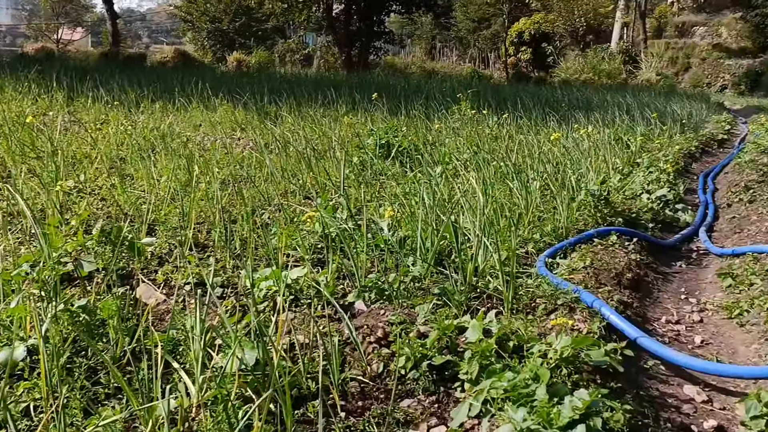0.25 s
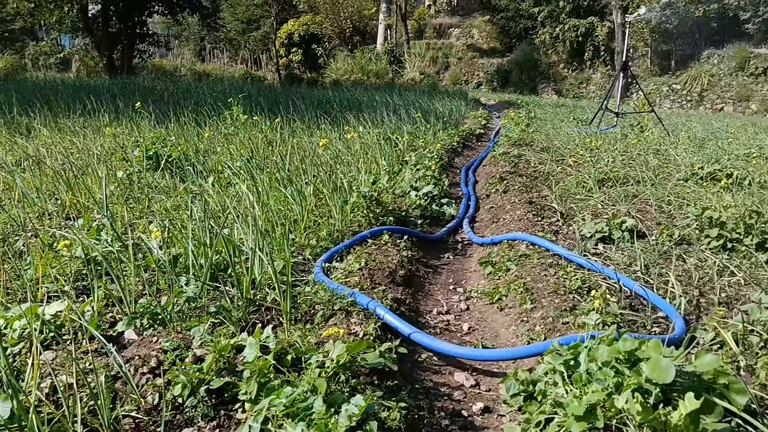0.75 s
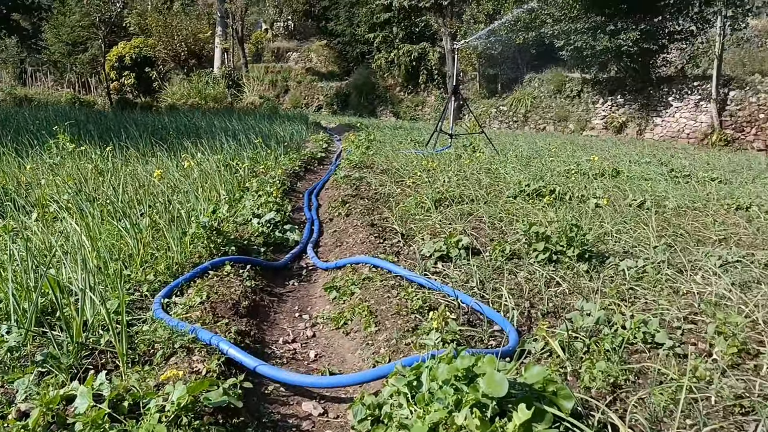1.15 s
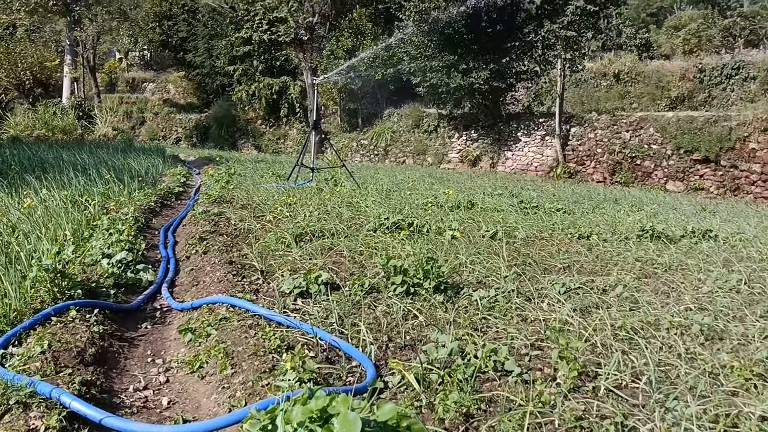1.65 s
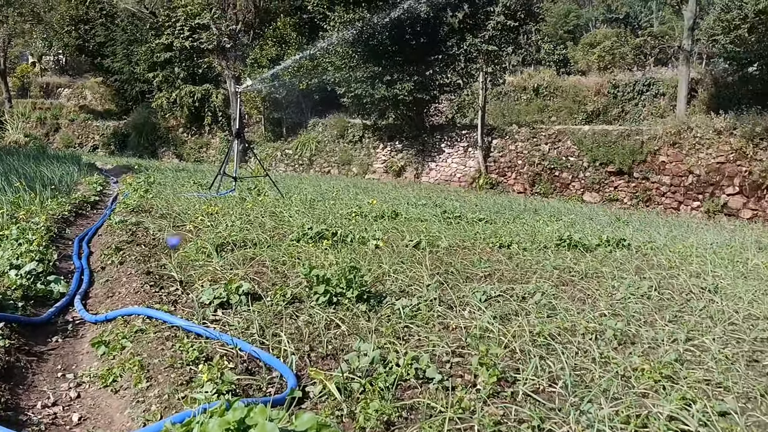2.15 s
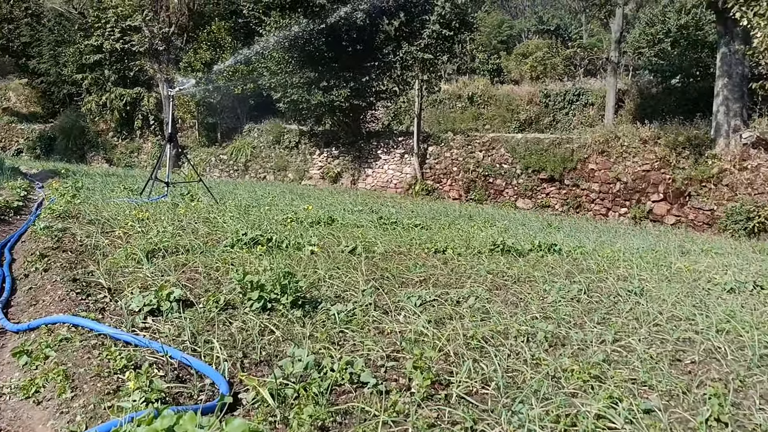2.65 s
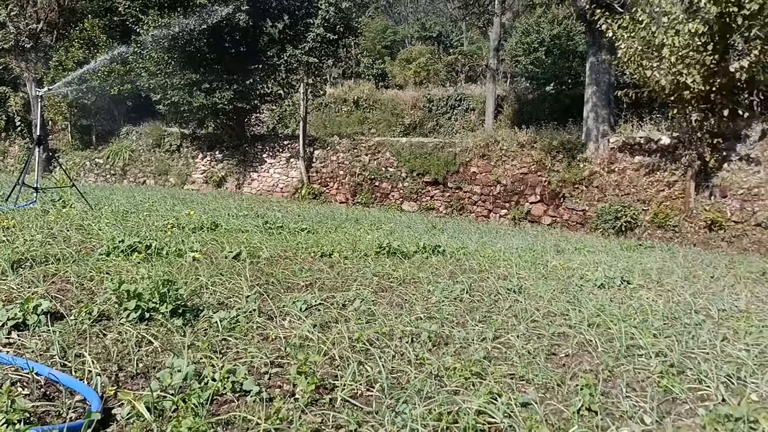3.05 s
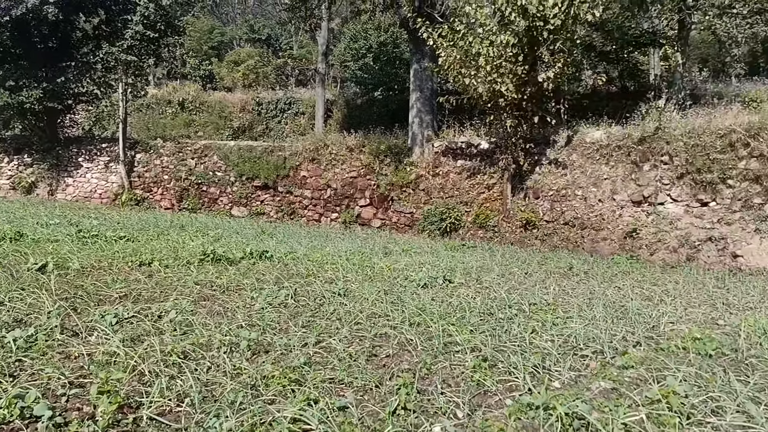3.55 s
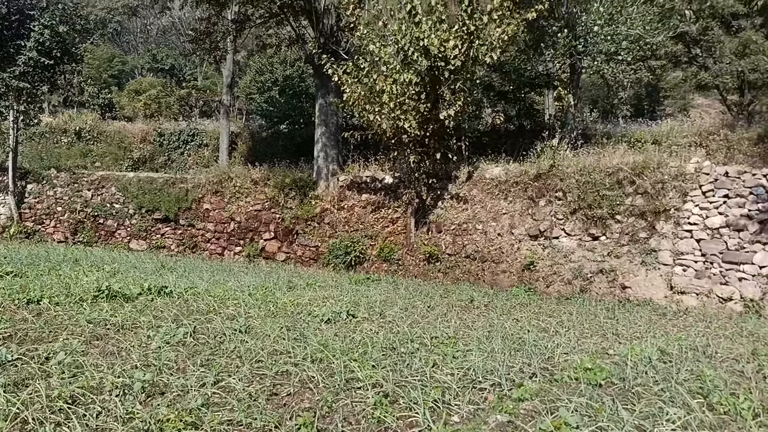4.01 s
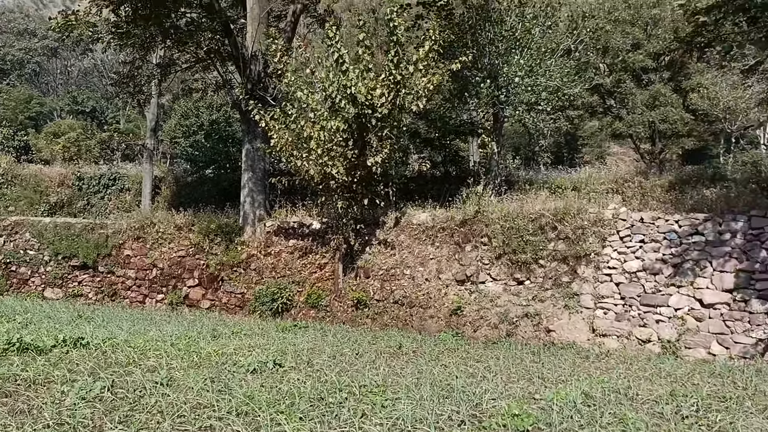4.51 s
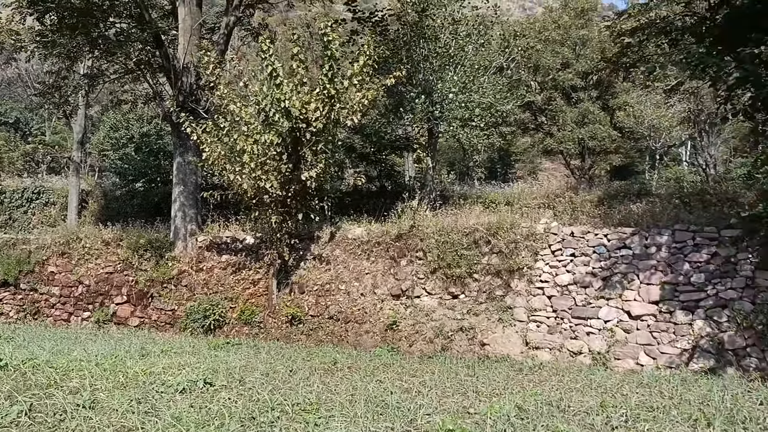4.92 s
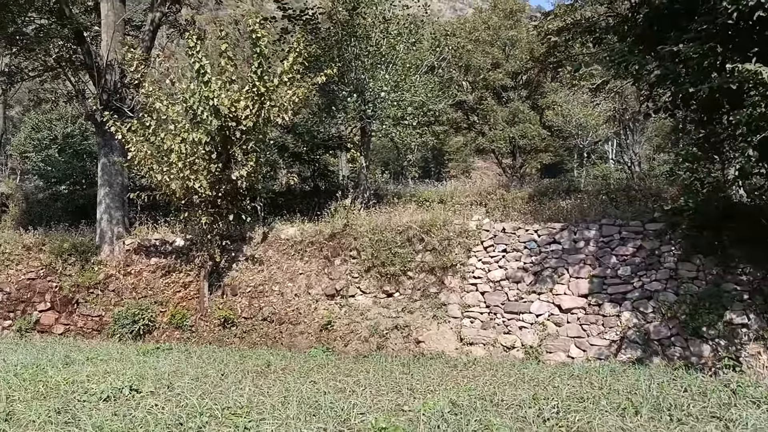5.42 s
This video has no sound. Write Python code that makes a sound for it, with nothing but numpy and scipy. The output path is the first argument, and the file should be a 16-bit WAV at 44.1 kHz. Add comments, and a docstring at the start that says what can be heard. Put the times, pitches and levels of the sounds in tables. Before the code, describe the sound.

Regular splashy bursts of a sprinkler arm cutting its water jet, with soft spray hiss and light outdoor rumble. Small snaps and irregular splashes appear midway, plus one faint thin note. After four seconds a hard clack starts a fast, even rattle of slaps and knocks, lasting to the end with soft thuds near the microphone. Weak, short echo from stone walls and trees; the source pans right to left.

```python
"""Impact sprinkler on a terraced field

A sprung arm slaps the jet six times a second; then the reversing catch trips and it hammers back twice as fast.
Slaps are shaped bursts of random drops; knocks and dry ticks are damped modes; jet and mist are coloured noise.
The sprinkler's bearing pans from right to left by arrival time, and stone walls and trees echo it.
A low rumble, far hums, one thin note and a few soft thuds complete the field."""
import sys
import numpy as np
from scipy import signal
from scipy.fft import rfft, irfft
from scipy.io import wavfile
from scipy.ndimage import map_coordinates

SR = 44100
rng = np.random.default_rng(int(sys.argv[2]) if len(sys.argv) > 2 else 0)


def file_out(sig):
    """Save sig as 16-bit WAV at sys.argv[1]."""
    # one column per channel
    cols = np.atleast_2d(sig).T
    # limit, then scale
    lim = np.clip(cols, -1, 1)
    pcm = np.round(lim * 32767).astype(np.int16)
    wavfile.write(sys.argv[1], SR, pcm)


N = 267687
TIME = np.arange(N) / SR
FREQS = np.fft.rfftfreq(N, 1 / SR)


def undb(db):
    """Logarithmic level: decibels to amplitude gain."""
    return 10 ** (np.asarray(db) / 20)


def unit(x):
    """Normalization by energy: scale to rms 1."""
    return x / np.sqrt(np.mean(x ** 2))


def curve(rows, axis=1):
    """Linear interpolation: one column of a table over time."""
    rows = np.array(rows)
    return np.interp(TIME, rows[:, 0], rows[:, axis])


def response(points):
    """Frequency response: gain at every frequency from (Hz, dB) points on a log axis."""
    hz, db = np.transpose(points)
    return undb(np.interp(np.log(FREQS + 1), np.log(hz), db))


def colour(x, points):
    """Spectral shaping: filter by a spectrum, keeping the power of white noise."""
    return irfft(rfft(x) * unit(response(points)), N)


def wander(rate):
    """Random modulation: normal values at a rate per second, joined by straight lines."""
    knots = rng.standard_normal(2048)
    return 1.55 * np.interp(TIME * rate, np.arange(len(knots)), knots)


def drops(rate, spread_db, mist, channels=3):
    """Shot noise: droplet impacts of very unequal size, over a smooth mist."""
    hit = rng.random((channels, N)) < rate / SR
    size = undb(spread_db * np.minimum(rng.standard_exponential((channels, N)), 4.5))
    impacts = unit(hit * size * rng.standard_normal((channels, N)))
    return unit(impacts + mist * rng.standard_normal((channels, N)))


def arrive(x, lead_ms):
    """Interaural-style time difference: one sound at two ports, the left earlier by the lead."""
    shift = lead_ms * SR / 2000  # half the lead at each port, in samples
    return np.array([map_coordinates(x, [np.arange(N) + side * shift], order=3) for side in (1, -1)])


# bearing of the sprinkler: start_s, lead of the left port [ms]
BEARING = [(0, -0.4), (.75, -0.23), (1.25, 0.33), (1.8, 0.36), (4.2, 0.474), (6, 0.52)]


def spread(three, direct):
    """Partial coherence: one signal comes from the bearing, two more from all over the field."""
    direct = np.clip(direct, 0, 1)
    return np.sqrt(direct) * arrive(three[0], curve(BEARING)) + np.sqrt(1 - direct) * three[1:]


def ring(modes, detune, contact_s):
    """Modal synthesis: a short blow sets damped modes ringing, in a fresh mix, at peak 1."""
    t = np.arange(2048) / SR
    hz, width, db = np.array(modes).T[:, :, None]
    phase = 2 * np.pi * rng.random(hz.shape)
    size = undb(db + rng.standard_normal(hz.shape))
    decay = np.exp(-np.pi * width * t)
    y = (size * decay * np.sin(2 * np.pi * hz * detune * t + phase)).sum(axis=0)
    y *= 1 - np.exp(-(t / contact_s) ** 2)  # soft onset while the bodies touch
    return y / abs(y).max()


def scatter(x, share, span_s):
    """Multipath interference: paths a few ms apart give each hit its own uneven resonances."""
    lag = (SR * span_s * (.1 + rng.random(6))).astype(int)
    gain = share * rng.standard_normal(6) / np.sqrt(6)
    paths = sum(g * np.roll(x, k) for g, k in zip(gain, lag))
    return (x + paths) / np.sqrt(1 + (gain ** 2).sum())


def place(x, start):
    """Superposition in time: lay a short sound into the scene at a start time."""
    return np.pad(x, (max(int(start * SR), 0), N))[:N]


# spray: start_s, hiss_level_db, mean mist_level_db
SPRAY = [(0, -46.5, -56), (0.9, -49, -56), (1.45, -46.5, -52), (2.2, -48, -55), (2.7, -46, -53.5),
         (4.25, -47.5, -52.5), (4.5, -44.5, -45.5), (4.9, -44.5, -52), (6.07, -45, -50.5)]
# coarser spray, relative spectrum: frequency_hz, density_db [dB per Hz]
HISS_COLOUR = [(400, -13.5), (580, -16), (850, -1), (1000, -2.5), (1130, -7.5), (1600, -2), (3000, -2),
               (5200, -1), (6400, 3.5), (7500, -10.5), (12000, -22.5), (16000, -17)]
# fine mist at the nozzle, relative spectrum: frequency_hz, density_db [dB per Hz]
MIST_COLOUR = [(3000, -36), (7000, -24), (9500, -6), (12300, 3), (13500, -2), (16000, -0.5)]
SPRAY_BALANCE_DB = 2  # left minus right


def spray():
    """Turbulent jet noise hisses, drops patter on leaves, a few big ones stand out, mist sizzles."""
    patter = drops(rate=2500, spread_db=2.0, mist=1.43) * undb(0.56 * wander(25.015) + 1.0 * wander(140))
    splat = rng.standard_normal((3, 256)) * np.exp(-np.arange(256) / SR / 0.0018)
    big = signal.fftconvolve(drops(rate=25, spread_db=3.0, mist=0), splat, axes=1)[:, :N]
    hiss = spread(colour(patter, HISS_COLOUR) + undb(-18.5) * unit(big), direct=0.087)
    mist = spread(colour(drops(rate=3100, spread_db=7.5, mist=2.3), MIST_COLOUR), direct=0.087)
    balance = undb(np.array([[.5], [-.5]]) * SPRAY_BALANCE_DB)
    hiss_db = curve(SPRAY)
    mist_db = curve(SPRAY, axis=2) + 1.3 * wander(30)
    return balance * (hiss * undb(hiss_db) + mist * undb(mist_db))


def tone(hz, waver_hz, db):
    """Frequency modulation: a wavering sine of a given rms level."""
    pitch_hz = hz + waver_hz * wander(10)
    return np.sqrt(2) * undb(db) * np.sin(2 * np.pi * np.cumsum(pitch_hz) / SR)


# outdoor rumble, relative spectrum: frequency_hz, density_db [dB per Hz]
AIR_COLOUR = [(13, -37), (22, -4), (58, -1.5), (92, -0.5), (129, 2), (329, -1.5), (497, -11.5),
              (572, -13.5), (650, -6.5), (840, -2), (1430, -120)]
# far-off hums that swell once: peak_s, swell half length_s, pitch_hz, peak level_db, swell_db
HUMS = [(2.37, 0.8, 65.3, -66.5, 9), (2.1, 0.74, 127.5, -70.5, 9), (5.5, 0.77, 178.3, -66.5, 17)]


def valley():
    """Ambient noise floor: low outdoor rumble, light air at each port, wavering far-off hums."""
    air = colour(rng.standard_normal((3, N)), AIR_COLOUR) * undb(1.23 * wander(9))
    breeze_colour = [(15, -11), (35, 4), (90, -4), (200, -9), (800, -52)]
    breeze = colour(rng.standard_normal((2, N)), breeze_colour) * undb(1.8 * wander(7))
    hum = 0
    for peak, half, hz, db, swell_db in HUMS:
        below_peak_db = swell_db * (1 - np.exp(-((TIME - peak) / half) ** 2))
        hum = hum + tone(hz, waver_hz=0.0157 * hz, db=db - below_peak_db)
    # the first air signal is common to both ports
    return undb(-62.5) * (air[0] + 0.44 * air[1:]) + undb(-73.5) * breeze + hum


def bursts(rows, rise_s, decay_s, sheet, graze, tail_db, tail_s):
    """Jet interruption: the spoon grazes the jet, water bursts, sheets off while in it, then scatters."""
    out, before = np.zeros(N), .04  # the approach starts this many seconds early
    t = np.arange(SR // 4) / SR - before
    entry = .5 + .5 * np.tanh((t - rise_s) / rise_s)
    approach = graze * np.exp(np.minimum(t, 0) / 0.013) * (1 - entry)
    age = np.maximum(t - 2 * rise_s, 0)
    tail = undb(tail_db) * np.exp(-age / tail_s)
    water = drops(rate=7000, spread_db=2.2, mist=.6) * undb(1.5 * wander(420))
    low = signal.sosfilt(signal.butter(2, 4000, fs=SR, output="sos"), water)
    high = signal.sosfilt(signal.butter(2, 4000, "high", fs=SR, output="sos"), water)
    for k, (start, db, treble_db, dwell) in enumerate(rows):
        in_jet = .5 - .5 * np.tanh((t - dwell) / 0.0024)
        shape = approach + entry * ((np.exp(-age / decay_s) + sheet) * in_jet + tail)
        part = k * (SR // 8) + np.arange(len(t))  # another stretch of water for each stroke
        burst = shape * (undb(db) * low[:, part] - undb(treble_db) * high[:, part])
        # a stroke throws the same amount of water however it breaks into drops
        burst *= np.std(shape) / np.std(shape * water[:, part], axis=1, keepdims=True)
        out = out + np.array([place(scatter(b, share=.7, span_s=.003), start - before) for b in burst])
    return out


# the fast return: first knock, first period, and how much each stroke shortens
RETURN_START_S, RETURN_PERIOD_S, RETURN_QUICKEN_S = 4.5071, 0.08144, 0.00009


def return_beats(count):
    """Quickening periodic motion: times at which the arm strikes its stop on the return."""
    periods = RETURN_PERIOD_S - RETURN_QUICKEN_S * np.arange(count)
    return RETURN_START_S + np.cumsum(periods) - periods


# treble in the slaps, before mixing: start_s, level_db
SLAP_TREBLE = [(0, -31.5), (0.8, -32.5), (1.5, -29.5), (3.1, -30), (3.7, -36), (4.45, -29.5), (4.75, -32.5),
               (5.05, -27.5), (6.07, -28)]


def strokes(rows, dwell_s):
    """Time-varying timbre: give each slap the treble of its moment and its time in the jet."""
    return [(start, db, np.interp(start, *np.transpose(SLAP_TREBLE)), dwell_s) for start, db in rows]


# the spoon cuts the jet on the slow sweep, before mixing: start_s, level_db
SLAPS = [(0.0933, -24), (0.2521, -23.5), (0.411, -25), (0.58, -22), (0.728, -26.5), (0.9012, -25.5),
         (1.0514, -23.5), (1.2093, -24.5), (1.3655, -25), (1.5226, -26), (1.6815, -26.5), (1.8379, -23),
         (1.9957, -23.5), (2.1518, -22), (2.3069, -26), (2.4794, -25.5), (2.6305, -26), (2.7896, -27.5),
         (2.9487, -28), (3.1023, -26.5), (3.258, -26.5), (3.4156, -29.5), (3.5864, -29), (3.7514, -24),
         (3.9041, -25), (4.0761, -25), (4.228, -24.5), (4.3955, -22)]
# stray splashes between the beats, before mixing: start_s, level_db, length_s
SPLASHES = [(1.3435, -34, 0.02), (1.412, -36.5, 0.031), (1.446, -30.5, 0.017), (1.7566, -31, 0.041),
            (1.885, -29.5, 0.018), (2.182, -33.5, 0.019), (2.202, -27, 0.02), (2.262, -34, 0.042),
            (2.553, -39, 0.016), (2.591, -33, 0.014)]
# slow slaps and splashes, relative spectrum: frequency_hz, density_db [dB per Hz]
SLAP_COLOUR = [(150, -13), (550, -22), (900, -11.5), (1150, -13), (1500, -8), (2300, -9), (2900, -1.5),
               (3500, -5), (5000, -2), (6400, 3.5), (7500, -12.5), (10000, -13.5), (12300, -7),
               (16000, -23.5)]
# return slaps, relative spectrum: frequency_hz, density_db [dB per Hz]
RETURN_COLOUR = [(300, -13), (900, -22), (1200, -13), (2200, -5.5), (2850, 4.5), (3300, -2), (4100, 4.5),
                 (4600, 0.5), (5200, 4), (6200, 1), (7500, -14), (10000, -11.5), (12500, -7.5),
                 (16000, -22)]
# the catch trips and throws the arm against its stop, before mixing: start_s, level_db
TRIP_KNOCKS = [(4.4173, -20), (4.423, -30), (4.431, -26)]
# modes of the arm: pitch_hz, width_hz, relative level_db
ARM_MODES = [(2990, 355, -6.5), (3820, 940, -2), (4560, 700, -24), (6140, 730, -11)]
# the knocks harden over the return: contact time of the first and of the last [s]
KNOCK_CONTACT_S = (0.0018, 0.00053)
SWEEP_DWELL_S = 0.024  # time the spoon stays in the jet on the slow sweep
# each return slap comes ahead of its knock and lasts until about then
SLAP_LEAD_S, RETURN_DWELL_S = 0.0385, 0.0383
# over the return the slaps grow while the knocks fade; strokes differ a little (levels before mixing)
RETURN_DB, RETURN_SWELL_DB_PER_S, RETURN_SCATTER_DB = -29.5, 3.5, 0.76
KNOCK_DB, KNOCK_FADE_DB_PER_S, KNOCK_DETUNE = -24.5, 2.5, 0.012
SPLASH_TREBLE_DB = -38.5  # before mixing


def sprinkler():
    """Impact excitation: slaps of the slow sweep, then longer slaps and arm knocks of the return."""
    beats = return_beats(count=20)
    since = beats - RETURN_START_S
    slap_db = RETURN_DB + RETURN_SWELL_DB_PER_S * since + RETURN_SCATTER_DB * rng.standard_normal(len(beats))
    sweep = strokes(SLAPS, SWEEP_DWELL_S)
    back = strokes(zip(beats - SLAP_LEAD_S, slap_db), RETURN_DWELL_S)
    splashes = [(start, db, SPLASH_TREBLE_DB, length) for start, db, length in SPLASHES]
    slow = bursts(sweep, rise_s=0.00095, decay_s=0.0047, sheet=0.43, graze=0.36, tail_db=-28.0, tail_s=0.055)
    fast = bursts(back, rise_s=0.0016, decay_s=0.0039, sheet=0.56, graze=0.32, tail_db=-28, tail_s=0.036)
    stray = bursts(splashes, rise_s=0.0022, decay_s=0.005, sheet=0.39, graze=0.4, tail_db=-10.5, tail_s=0.033)
    slow, stray = colour(slow, SLAP_COLOUR), colour(stray, SLAP_COLOUR)
    fast = colour(fast, RETURN_COLOUR)
    water = spread(undb(-7.5) * slow + undb(-9) * fast + undb(-7.5) * stray, direct=0.47)

    arm = np.zeros(N)
    knock_db = KNOCK_DB - KNOCK_FADE_DB_PER_S * since
    for start, db in TRIP_KNOCKS + list(zip(beats, knock_db)):
        contact_s = np.interp(start, [beats[0], beats[-1]], KNOCK_CONTACT_S)
        knock = ring(ARM_MODES, 1 + KNOCK_DETUNE * rng.standard_normal(), contact_s)
        arm += undb(db) * place(scatter(knock, share=0.27, span_s=0.00305), start)
    arm_balance = undb(np.array([[-1], [1]]) * 3.06)  # stronger at the right port
    return water + undb(0.5) * arrive(arm, curve(BEARING)) * arm_balance


# dry ticks, before the port levels: start_s, level_db
TICKS = [(0.411, -20), (1.3203, -10.5), (1.323, -14.5), (1.412, -17), (1.763, -27), (1.894, -28),
         (2.157, -14.5), (2.559, -20.5), (2.631, -19.5), (5.121, -26), (5.203, -20), (5.606, -21)]
# modes of a tick, before retuning: pitch_hz, width_hz, relative level_db
TICK_MODES = [(2850, 720, -4), (3940, 280, -9.5), (4700, 1000, -14), (5400, 710, 7.5), (6280, 470, -1)]


def ticks():
    """Damped modal impact: hard little snaps, stronger at the right port, each with a brief rattle."""
    snaps = np.zeros(N)
    for start, db in TICKS:
        snap = ring(TICK_MODES, 0.97, contact_s=0.0011)
        snaps += undb(db) * place(scatter(snap, share=.35, span_s=.006), start)
    return arrive(snaps, 0.44) * undb(np.array([[-10], [-1.5]]))


def terraces(x, wet_db, buildup_s, t60_s):
    """Diffuse reverberation: stone walls and trees scatter a weak echo that builds up, then decays."""
    t = np.arange(SR // 2) / SR
    tail = rng.standard_normal((2, len(t))) * undb(-60 * t / t60_s) * np.minimum(t / buildup_s, 1) ** 2
    tail /= np.sqrt((tail ** 2).sum(axis=1, keepdims=True))
    return undb(wet_db) * signal.fftconvolve(x, tail, axes=1)[:, :N]


def whistle(start, length, hz, db):
    """Pure tone: one faint, thin, nearly level note, like a far bird."""
    u = np.clip((TIME - start) / length, 0, 1)
    pitch_hz = hz * (1 - 0.017 * u + 0.0058 * wander(150))
    envelope = abs(np.sin(np.pi * u)) ** 0.24
    return undb(db) * envelope * np.sin(2 * np.pi * np.cumsum(pitch_hz) / SR)


# modes of a hollow thump, before retuning: pitch_hz, width_hz, relative level_db
THUMP_MODES = [(135, 63, 0), (300, 45, 2.5)]
# soft scuffs on the soil: start_s, level_db, rise_s, decay_s, upper edge_hz
THUDS = [(5.361, -41.5, 0.019, 0.033, 1400), (5.391, -41.5, 0.0083, 0.018, 477),
         (5.596, -46, 0.022, 0.035, 1300)]
# loose soil, relative spectrum: frequency_hz, density_db [dB per Hz]
SOIL_COLOUR = [(60, -30), (150, -12), (300, -3), (450, -2), (600, -10), (820, -3), (1050, -1.5), (1500, -9),
               (3000, -35)]


def thuds():
    """Modal thump and friction noise: one hollow thump, then dull scuffs on loose soil."""
    out = undb(-35.0) * place(ring(THUMP_MODES, 0.94, contact_s=.002), 5.063)
    for start, db, rise, decay, edge_hz in THUDS:
        t = np.maximum(TIME - start, 0)
        soil = colour(rng.standard_normal(N), SOIL_COLOUR) * undb(1.8 * wander(120))
        soil = unit(signal.sosfilt(signal.butter(4, edge_hz, fs=SR, output="sos"), soil))
        envelope = np.minimum(t / rise, 1) * np.exp(-np.maximum(t - rise, 0) / decay)
        out += undb(db) * soil * envelope
    return arrive(out, -0.17)


def scene():
    """Superposition: sprinkler and ticks with their echo, over spray, valley and small sounds."""
    near = sprinkler() + ticks()
    echo = terraces(near, wet_db=-9.5, buildup_s=0.051, t60_s=0.15)
    note = whistle(start=1.552, length=0.104, hz=2500, db=-52.5)
    return near + echo + spray() + thuds() + valley() + note


# the two ports differ in sensitivity: frequency_hz, left minus right level_db
PORTS = [(60, -6.5), (250, -1), (900, -5), (1150, -3), (1800, -8.5), (3000, -5), (4500, -7), (6300, -14),
         (7200, -7.5), (8200, 4), (10000, 0), (12500, -8), (15500, -12)]


def record(dry):
    """Transducer response: each port has its own colour; an elliptic low-pass cuts the top steeply."""
    left = response(PORTS)
    ports = np.array([left, np.ones_like(left)]) / np.sqrt((1 + left ** 2) / 2)
    top_cut = signal.ellip(10, .2, 80, 15900, fs=SR, output="sos")
    return signal.sosfilt(top_cut, irfft(rfft(dry) * ports, N))


dry = scene()
out = record(dry)
file_out(out)
```